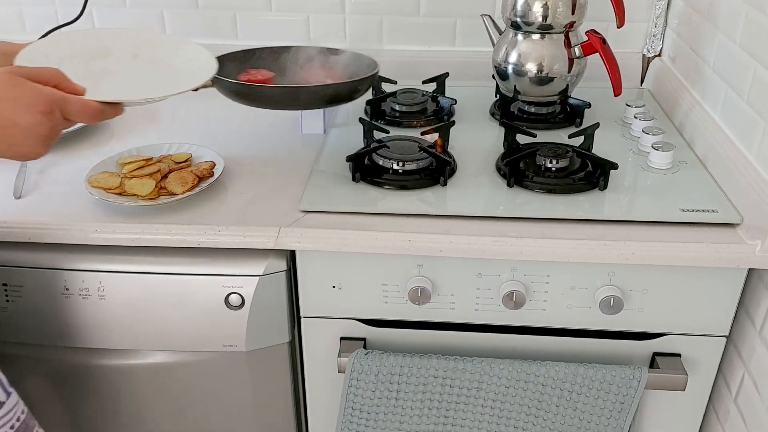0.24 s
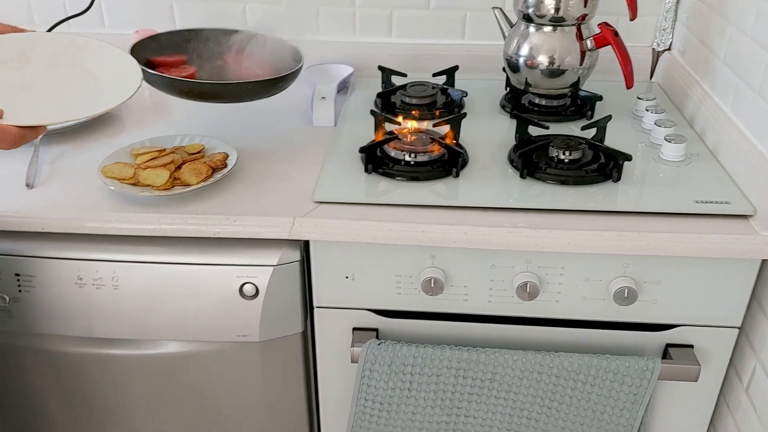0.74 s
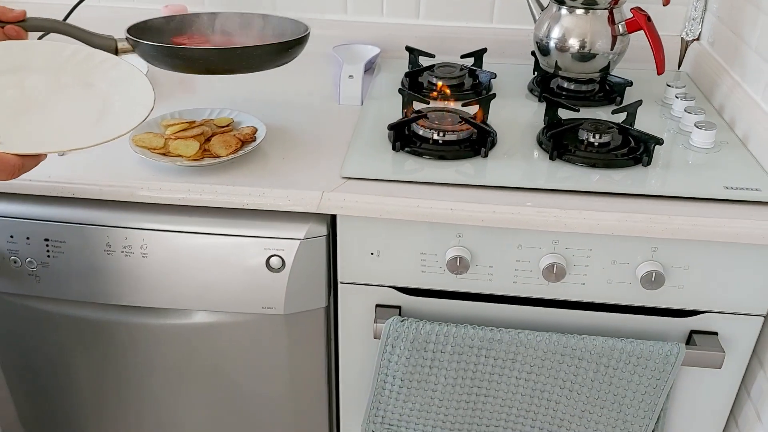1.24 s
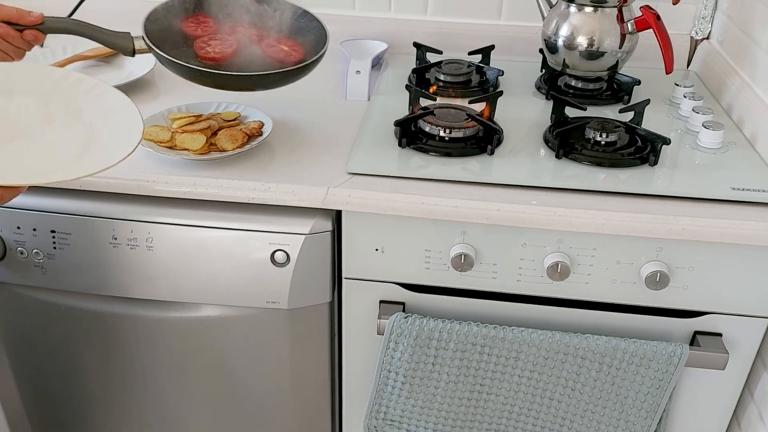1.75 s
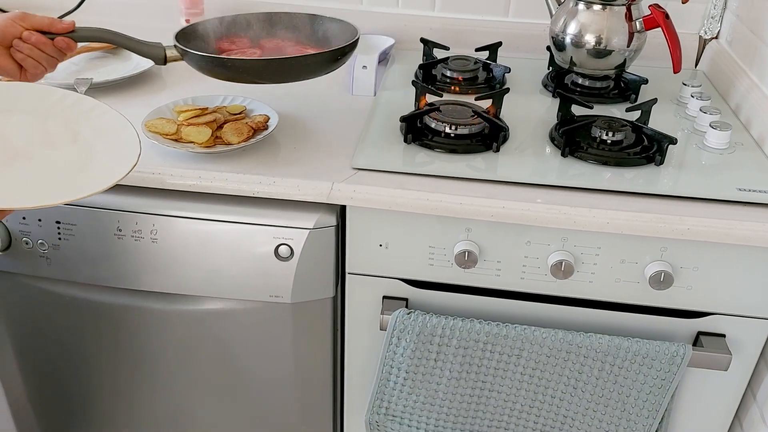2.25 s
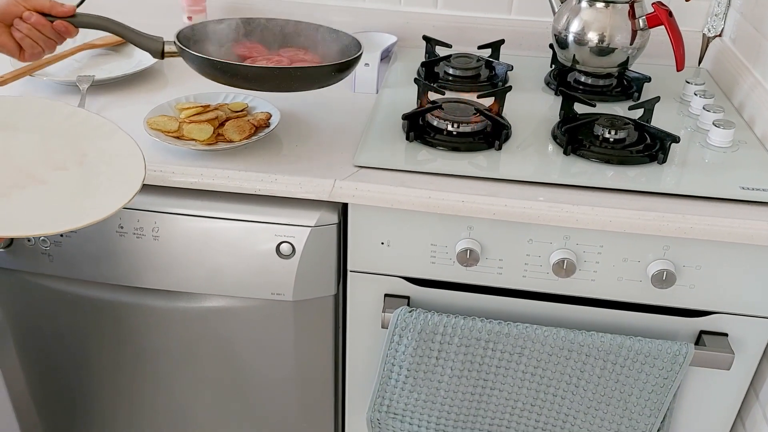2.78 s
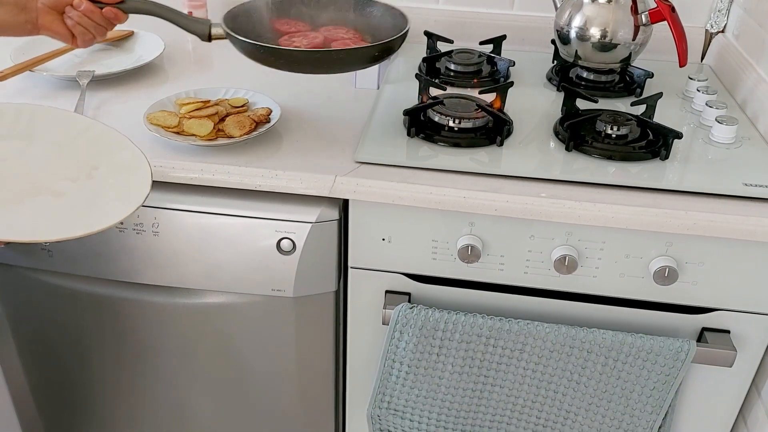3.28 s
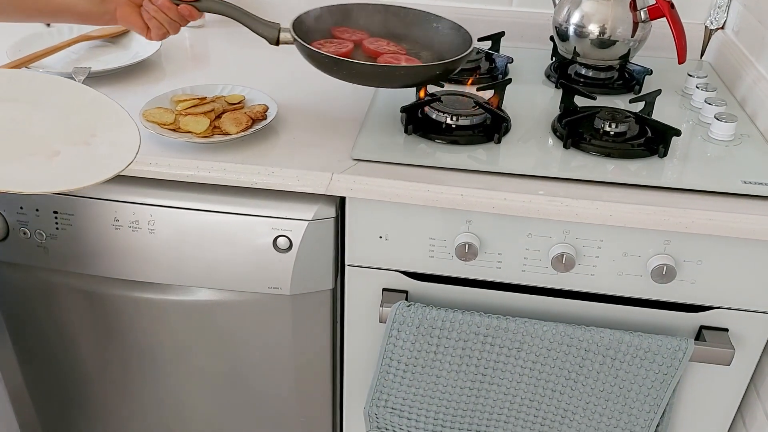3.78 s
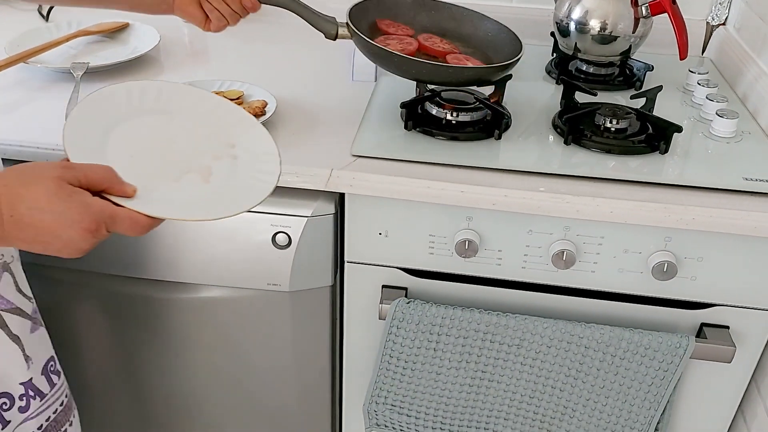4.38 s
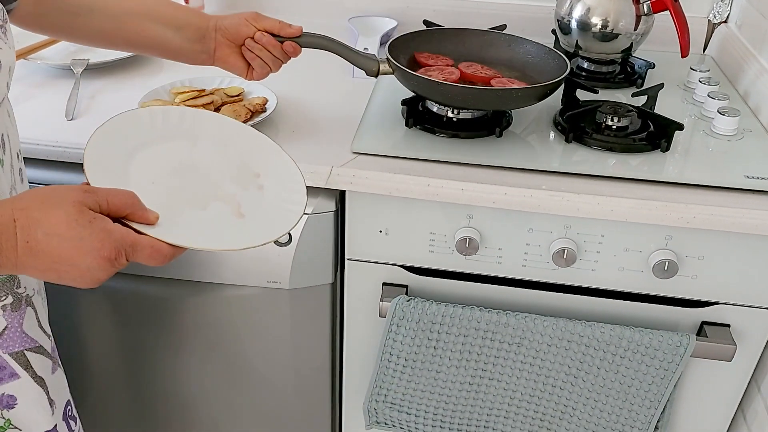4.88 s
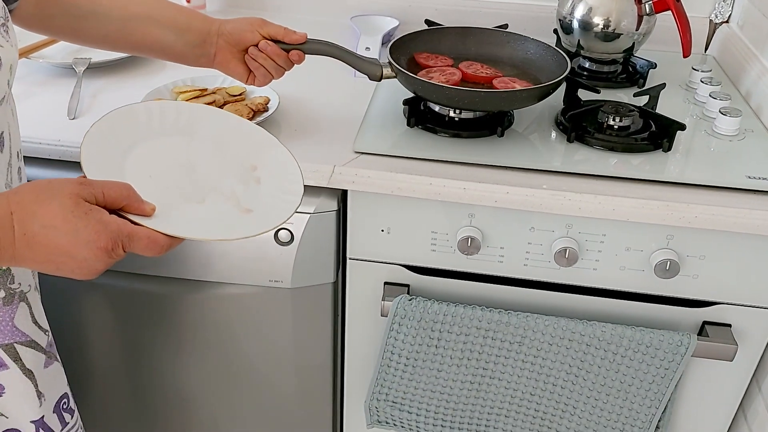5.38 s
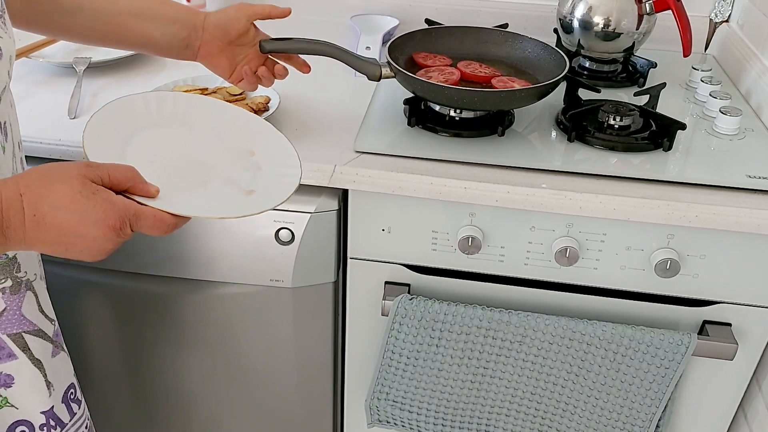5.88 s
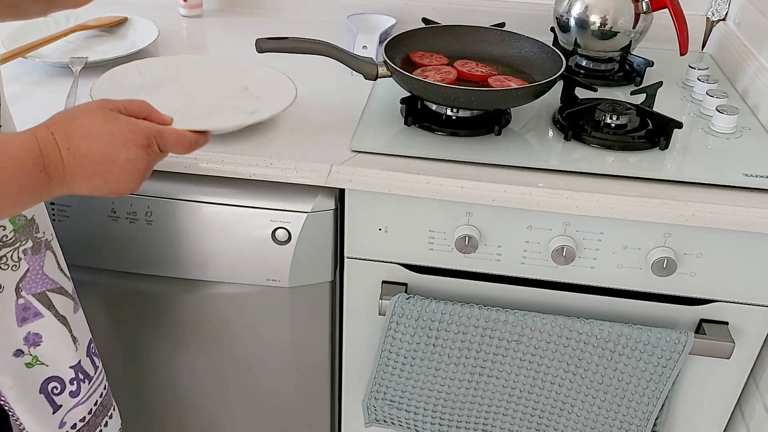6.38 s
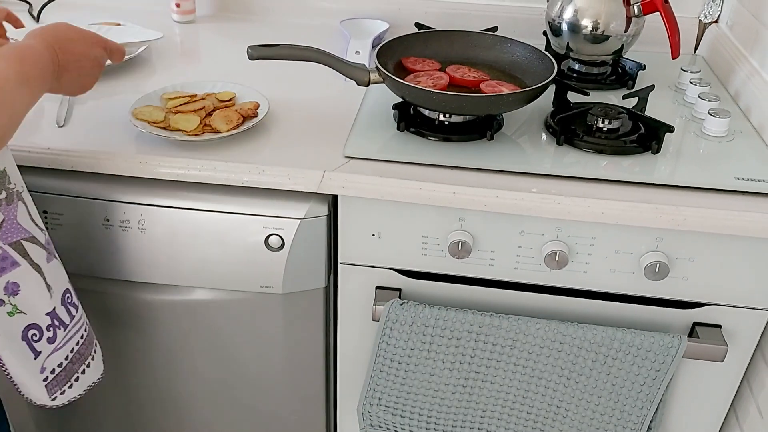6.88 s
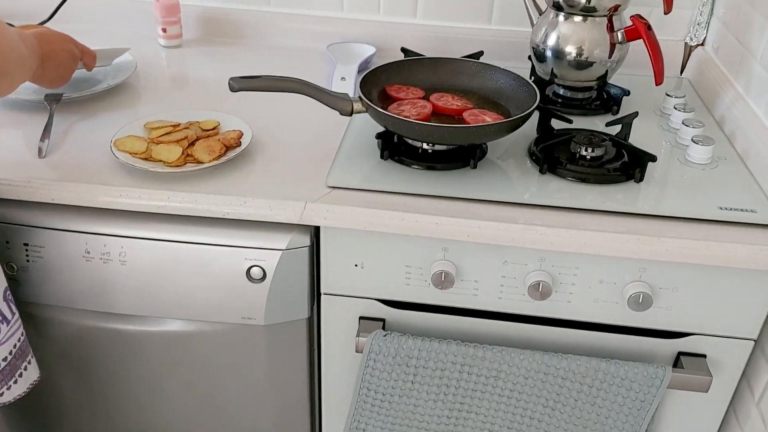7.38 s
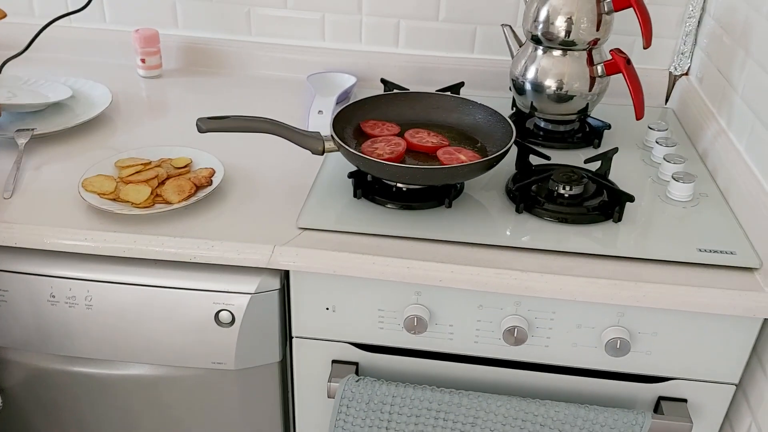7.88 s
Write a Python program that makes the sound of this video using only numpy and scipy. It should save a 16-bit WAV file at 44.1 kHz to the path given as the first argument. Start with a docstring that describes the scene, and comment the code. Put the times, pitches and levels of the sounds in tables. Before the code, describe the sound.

A bright, dense frying hiss with coarse crackles surges over a soft gas roar, heard close up with short tile reflections. Around the middle it eases to a thinner fizz. Dull metallic thuds and scrapes follow as the pan settles on the grate, then stray oil spits and small bumps, and last a sharp, quick rattle of china.

```python
"""Sizzling pan on a gas hob

Close at the hob in a small tiled kitchen: tomato slices sizzle in hot oil (coloured bubble pings and noise)
while the pan is swirled beside a roaring burner (fluttering noise), whose flame flares briefly.
The sizzle settles as the oil cools, then noise bursts set the pan down on the iron grate.
Last, a china plate clatters onto another (decaying sines), and the recorder's gain control turns all down."""
import sys
import numpy as np
from scipy import signal
from scipy.fft import rfft, irfft, next_fast_len
from scipy.io import wavfile
from scipy.ndimage import uniform_filter1d

SR = 44100
rng = np.random.default_rng(int(sys.argv[2]) if len(sys.argv) > 2 else 0)


def bounce(signal):
    """Save signal as a 16-bit WAV file at the path given by the first command-line argument."""
    frames = np.transpose(np.atleast_2d(signal))
    limited = np.clip(frames, -1, 1)
    pcm = np.round(limited * 32767).astype(np.int16)
    wavfile.write(sys.argv[1], SR, pcm)


N = 358908
T = np.arange(N) / SR


def amp(db):
    """Decibels to gain."""
    return 10 ** (np.asarray(db) / 20)


def unit(x):
    """Scales to an rms of one."""
    return x / np.sqrt(np.mean(x ** 2) + 1e-20)


def read(points, hz):
    """Reads a curve at any frequency, straight between its points on a log frequency axis."""
    f, value = np.transpose(points)
    return np.interp(np.log(hz + 1), np.log(f), value)


def add(mix, s, sound):
    """Mixes a stereo sound in at s seconds."""
    part = mix[:, round(s * SR):][:, :sound.shape[1]]
    part += sound[:, :part.shape[1]]


def colour(pair, spectrum):
    """Gives two unrelated signals a spectrum; the two microphones share the bass but not the treble."""
    # likeness of the two microphones: f/Hz, correlation
    likeness = [(100, 1), (300, 0.7), (650, 0.64), (1400, 0), (3000, 0)]
    # balance of the two microphones: f/Hz, left minus right/dB
    balance = [(110, -1.5), (400, -0.56), (750, 0.96), (1300, 2.1), (2400, 0.22), (8000, 0.65)]
    size = next_fast_len(pair.shape[1])
    hz = np.fft.rfftfreq(size, 1 / SR)
    a, b = rfft(pair, size)
    same = np.clip(read(likeness, hz), -1, 1)
    lean = amp(read(balance, hz) / 2)
    left = a * lean
    right = (same * a + np.sqrt(1 - same ** 2) * b) / lean
    shaped = np.array([left, right]) * amp(read(spectrum, hz))
    return unit(irfft(shaped, size)[:, :pair.shape[1]])


def drift(low_hz, high_hz):
    """Random wandering, rms one: a sum of sines with random phases."""
    t = T[::128]
    rates = np.geomspace(low_hz, high_hz, num=40)[:, None]
    waves = np.sin(2 * np.pi * (rates * t + rng.random(rates.shape))) / rates ** 0.08
    return np.interp(T, t, unit(waves.sum(0)))


def burst(spectrum, t60):
    """A blow into a body with many close, well-damped resonances: decaying coloured noise."""
    t = T[:SR // 2]
    return colour(rng.standard_normal((2, len(t))), spectrum) * amp(-60 * t / t60)


def kitchen(x, wet_db):
    """Adds the ring of a small tiled room, the treble dying first."""
    # ring of the room: f/Hz, t60/s
    ring_times = [(100, 0.3), (500, 0.43), (2000, 0.3), (6000, 0.22), (14000, 0.11)]
    hz, t, z = signal.stft(rng.standard_normal((2, SR // 2)), SR, nperseg=256)
    decay = amp(-60 * t / read(ring_times, hz)[:, None])
    tail = signal.istft(z * decay, SR, nperseg=256)[1]
    build_up = (1 - np.exp(-T[:tail.shape[1]] / 0.0041)) ** 2
    tail = colour(tail * build_up, [(1, 0)])
    wet = signal.fftconvolve(x, tail / np.linalg.norm(tail[0]), axes=1)[:, :N]
    return x + amp(wet_db) * wet


def hum(width_hz, level_db):
    """A faint, blurred hum stands in the room: noise narrowed to a few soft peaks."""
    # peaks of the hum: f/Hz, relative level/dB
    peaks = [(72, -74), (157, -75.5), (330, -72), (413, -64), (468, -65.5), (538, -70)]
    hz = np.fft.rfftfreq(N, 1 / SR)
    shape = sum(amp(db) / (1 + ((hz - f) / width_hz) ** 2) for f, db in peaks)
    noise = rfft(rng.standard_normal((2, N)))
    return amp(level_db) * colour(irfft(noise * shape, N), [(1, 0)])


def cooled(cooling, lag_s=0):
    """Level in dB as the oil cools: an S-shaped slide from hot to cool."""
    hot_db, cool_db, halfway_s, fall_s = cooling
    return cool_db + (hot_db - cool_db) / (1 + np.exp((T - lag_s - halfway_s) / fall_s))


def burner():
    """The gas flame roars and flutters; each flare of oil mist builds quickly and dies away."""
    # spectrum of the roar: f/Hz, relative level per Hz/dB
    roar = [(20, -26), (45, -22), (75, -6.5), (120, -5), (170, 0.5), (220, -4.5), (400, -0.5), (600, -2.5),
            (1500, -22), (5000, -50)]
    # the roar sinks as less oil mist reaches it: hot level/dB, cooled level/dB, halfway t/s, time scale/s
    roar_cooling = (-56, -66, 3.5, 0.3)
    # oil mist catches fire over the burner: start t/s, level/dB, rise/s, t60 of the dying roar/s
    flares = [(0, -55, 0.037, 1.2), (.3, -45, .2, 2.5), (1.2, -56, 0.088, 1.1), (3.4, -61, 0.37, 3)]
    level = amp(cooled(roar_cooling))
    for s, db, rise_s, t60 in flares:
        rise = np.clip((T - s) / rise_s, 0, 1)
        fall_db = -60 * np.maximum(T - s - rise_s, 0) / t60
        level = level + rise * amp(db + fall_db)
    flutter_db = 1.3 * drift(low_hz=3, high_hz=18)
    return colour(rng.standard_normal((2, N)), roar) * level * amp(flutter_db)


def china(modes, hard_hz, scatter_db, detune=0.0043):
    """One strike on a plate: each contact favours and bends other modes; a soft one spares the high ones."""
    t = T[:SR // 2]
    hz, mode_db, t60 = np.transpose(modes)[:, :, None]
    hz = hz * (1 + detune * rng.standard_normal(hz.shape))
    scattered_db = mode_db + scatter_db * rng.standard_normal((2, len(hz), 1))
    weight = amp(scattered_db) / np.hypot(1, (hz / hard_hz) ** 2)
    phase = rng.random((2, len(hz), 1))
    return (weight * amp(-60 * t / t60) * np.sin(2 * np.pi * (hz * t + phase))).sum(1)


def plates(scatter_db, thud_t60, left_db, tick_db):
    """A plate rattles to rest on another: each contact ticks, rings the china and thumps the counter."""
    # contacts: t/s, upper plate level/dB, lower plate level/dB, thud level/dB, hardness f/Hz
    clatter = [(7.685, -6.5, -15, -18, 7500), (7.698, -11, -30, -13.5, 6000), (7.729, -14, -34, -18, 5000),
               (7.755, -16, -25, -22.5, 3000), (7.879, -17, -8.5, -11, 4500), (7.891, -6, -15, -13.5, 4020),
               (7.908, -17.5, -15, -11.5, 6000), (7.920, -10.5, -11.5, -21, 12000),
               (7.931, -22, -25, -23, 5000), (7.959, -26, -11, -15, 3030), (7.972, -22, -21, -13, 4000),
               (7.988, -35, -31, -23, 2500)]
    # modes of the carried plate: f/Hz, level/dB, t60/s
    upper_plate = [(1862, -5.5, 0.13), (1930, 1, 0.16), (2944, -4.5, 0.083), (3000, -11, 0.17),
                   (3860, -21, 0.15), (4470, -16, 0.15), (5540, -16.5, 0.22), (6390, -24, .16),
                   (7030, -18, .24), (9780, -11, 0.19), (13700, -17, .12)]
    # modes of the plate it meets: f/Hz, level/dB, t60/s
    lower_plate = [(1012, -6, 0.13), (1115, -15, 0.085), (1210, -11.5, 0.1), (1590, -4.5, 0.073),
                   (1674, -4.5, 0.085), (1780, -7, .1), (2032, -2, 0.11), (2260, -4.5, 0.13),
                   (3130, -3.5, 0.11), (3850, -9, .1), (4730, -9.5, 0.094), (6940, -19, 0.092)]
    # spectrum of the counter's thump: f/Hz, relative level per Hz/dB
    counter_thud = [(25, -36), (70, -21), (110, -15), (158, 1), (215, -12), (450, -2), (750, -3.5),
                    (1000, -2), (1350, -0.5), (1750, 1), (2500, -3), (3150, -1), (3700, -13), (14000, -20)]
    out = np.zeros((2, N))
    for s, upper_db, lower_db, thud_db, hard_hz in clatter:
        ring = amp(upper_db) * china(upper_plate, hard_hz, scatter_db)
        ring += amp(lower_db) * china(lower_plate, hard_hz, scatter_db)
        tick_spectrum = [(hard_hz / 4, -30), (hard_hz, 0), (hard_hz * 2, -8)]
        tick = amp(max(upper_db, lower_db) + tick_db) * burst(tick_spectrum, t60=.08)
        thud = amp(thud_db) * burst(counter_thud, thud_t60)
        blow = ring * amp([[left_db], [-left_db]]) + tick + thud
        add(out, s, blow * (1 - np.exp(-T[:SR // 2] / 0.00065)))  # softened onset
    return kitchen(out, wet_db=-4.0)


def knocks():
    """The pan lands and rocks on the grate; small bumps and spits are humps of noise that die away."""
    # pan on the grate: t/s, thud level/dB, scrape level/dB
    landings = [(4.811, -50, -33), (5.051, -34, -32), (5.078, -34, -27.5), (5.103, -38, -48),
                (5.147, -36, -28), (5.163, -32, -38), (5.333, -41, -50), (5.36, -41, -48),
                (5.395, -43, -40)]
    # spectrum of the grate's thud: f/Hz, relative level per Hz/dB
    grate_thud = [(25, -36), (65, -9), (110, -13), (170, 5), (240, -7), (370, -8), (650, -5.5), (950, -10),
                  (1600, -22), (2500, -26), (12000, -55)]
    # spectrum of the scrape on the grate: f/Hz, relative level per Hz/dB
    grate_scrape = [(200, -28), (1000, -13), (1250, -4), (1600, -5), (2000, -8), (2400, -10), (5000, -22),
                    (12000, -50)]
    # soft bumps of handling and steps: t/s, level/dB, centre f/Hz, width/octaves, t60/s
    bumps = [(3.457, -35.5, 600, 0.82, 0.11), (4.06, -41, 600, 0.55, 0.09), (4.155, -40.5, 480, 0.43, 0.13),
             (6.96, -42.5, 554, 0.83, 0.21), (6.975, -45, 146, 0.34, 0.21), (7.25, -41.5, 570, .25, 0.15),
             (7.525, -33.5, 1500, 0.63, 0.13)]
    # larger spits of oil: t/s, level/dB, centre f/Hz, width/octaves, t60/s
    spits = [(.31, -26.5, 2330, .7, .04), (1.722, -23, 1980, 0.79, 0.035), (1.803, -21.5, 3120, .15, 0.092),
             (3.138, -28.5, 2100, 0.22, 0.14), (6.341, -30.5, 2500, 1.9, .04), (6.424, -43, 2500, 1.5, .04),
             (6.797, -39, 2500, 1.2, .04), (7.26, -27, 4500, 0.94, 0.081), (7.476, -30, 2200, 0.83, 0.052)]
    out = np.zeros((2, N))
    for s, thud_db, scrape_db in landings:
        thud = amp(thud_db) * burst(grate_thud, t60=0.16)
        scrape = amp(scrape_db) * burst(grate_scrape, t60=0.1)
        add(out, s, thud + scrape)
    hz = np.geomspace(30, 16000, num=80)
    for s, db, centre_hz, octaves, t60 in bumps + spits:
        hump_db = -20 * np.log10(1 + (np.log2(hz / centre_hz) / octaves) ** 2)
        dull_db = -20 * np.log10(1 + (hz / centre_hz / 3) ** 2)
        add(out, s, amp(db) * burst(np.c_[hz, hump_db + dull_db], t60))
    return kitchen(out, wet_db=-6.5)


def bubbles(per_s, low_hz, high_hz, cycles, spread_db, count=24):
    """Steam bubbles burst at random: many faint, a few strong, each a ping of a few cycles."""
    out = np.zeros((2, N))
    for hz in np.geomspace(low_hz, high_hz, count):
        when, size, side = rng.random((4000, 3))[:int(per_s * T[-1] / count)].T
        height = amp(spread_db * np.minimum(-np.log(1 - size), 4))
        at = (when * (N - 30)).astype(int)
        clicks = np.zeros((2, N))
        clicks[0, at] = height
        clicks[1, at + (side * 24).astype(int)] = height  # up to half a millisecond later at the right
        turns = hz * T[:300]
        ping = np.sin(2 * np.pi * turns) * np.exp(-turns / cycles)
        out += hz * signal.oaconvolve(clicks, ping[None], axes=1)[:, :N]
    # each burst bounces between the pan's wall and the tiles for a few milliseconds
    bounces = rng.standard_normal((2, 400)) * np.exp(-T[:400] / .002)
    flat = irfft(np.exp(1j * np.angle(rfft(bounces))))  # smears time, leaves the spectrum level
    return unit(signal.oaconvolve(out, flat, axes=1)[:, :N])


def swells():
    """What the swells add to the fizz and to the bubbling, in dB: one smooth hump each."""
    # mostly as the pan tilts and hot oil runs under the slices:
    # crest t/s, length/s, fizz level/dB, bubbling level/dB
    humps_table = [(.5, 0.74, 1.2, 1), (1.333, 0.37, 0.2, 0.8), (1.75, 0.78, 1.1, 2.2),
                   (2.346, 1, 2.7, 1.5), (3.0, 0.26, 1.5, -0.2), (3.953, 0.47, 0.9, -0.1),
                   (7.4, .6, 1, -0.1)]
    crest_s, length_s, fizz_db, bubbling_db = np.transpose(humps_table)
    place = (T - crest_s[:, None]) / length_s[:, None]
    humps = np.cos(np.pi * np.clip(place, -.5, .5)) ** 2
    return fizz_db @ humps, bubbling_db @ humps


def sizzle():
    """Countless tiny bursts merge into fizz; larger ones bubble and crackle under the wet slices."""
    # spectrum of the fizz: f/Hz, relative level per Hz/dB
    fizz_spectrum = [(40, -70), (500, -40), (1500, -24), (3200, -11.5), (4100, -9.5), (5300, -1.5),
                     (6700, -2), (7800, 0.6), (9400, -1.5), (11000, -2), (12400, -0.9), (14200, -3),
                     (15700, -3)]
    # spectrum of the bubbling: f/Hz, relative level per Hz/dB
    bubbling_spectrum = [(40, -55), (150, -30), (330, -19), (600, -14.5), (800, -12), (1000, -11.5),
                         (1250, -6), (1850, -1.5), (2250, -2.5), (3000, 0.5), (3600, -1.5), (5300, -2.5),
                         (6500, -9), (12000, -40)]
    # off the flame the fizz sinks: hot level/dB, cooled level/dB, halfway t/s, time scale/s
    fizz_cooling = (-19.5, -26, 3.5, .5)
    # the coarse bubbling sinks too: hot level/dB, cooled level/dB, halfway t/s, time scale/s
    bubbling_cooling = (-27, -36, 3.5, 0.66)
    surge = drift(low_hz=5, high_hz=35.4)  # steam escapes in uneven gushes
    fine = bubbles(per_s=2500, low_hz=3020, high_hz=14900, cycles=1.3, spread_db=4.5)
    fine = unit(kitchen(fine, wet_db=2.5))
    coarse = bubbles(per_s=800, low_hz=590, high_hz=5910, cycles=1.47, spread_db=4.0)
    coarse = unit(kitchen(coarse, wet_db=2.0))
    # the smallest bursts are too many to tell apart and blend into a wash
    fizz = colour(fine + amp(4) * rng.standard_normal((2, N)), fizz_spectrum)
    bubbling = colour(coarse + amp(3.5) * rng.standard_normal((2, N)), bubbling_spectrum)
    # the finest spray, the top of the fizz, holds out longer
    treble = signal.butter(N=3, Wn=9500, btype="high", fs=SR, output="sos")
    spray = signal.sosfiltfilt(treble, fizz)
    spray_db = cooled(fizz_cooling, lag_s=0.7) - 0.05
    fizz = (fizz - spray) * amp(cooled(fizz_cooling)) + spray * amp(spray_db)
    fizz_swell_db, bubbling_swell_db = swells()
    fizz *= amp(fizz_swell_db + 0.28 * surge)
    bubbling *= amp(cooled(bubbling_cooling) + bubbling_swell_db + 0.44 * surge)
    return fizz + bubbling


def hollow(x):
    """Fixed resonances of the pan and the tiled corner around it favour a few pitches."""
    # resonances: f/Hz, width/Hz, level/dB
    resonances = [(412, 21, 5), (490, 40, -0.5), (608, 15, 5.5), (677, 29, 4), (790, 37, 6),
                  (1156, 58, 5.5), (1690, 24, -3)]
    hz = np.fft.rfftfreq(N, 1 / SR)
    gain_db = sum(db / (1 + (2 * (hz - f) / width) ** 2) for f, width, db in resonances)
    return irfft(rfft(x) * amp(gain_db), N)


def scene():
    """Everything that sounds around the hob."""
    hob = hollow(sizzle() + burner())
    room = hum(width_hz=9.3, level_db=-61.0)
    china_clatter = plates(scatter_db=2.0, thud_t60=0.098, left_db=1.3, tick_db=-16)
    return hob + room + knocks() + china_clatter


def gain_control(x, threshold_db, most_db, attack_s, recover_db_per_s):
    """Loud sound turns the gain down within some hundredths of a second; it creeps back slowly."""
    power = uniform_filter1d((x ** 2).mean(0), size=256)
    power_db = 10 * np.log10(abs(power) + 1e-12)
    over_db = np.clip(power_db - threshold_db, 0, most_db)
    recovery_db = recover_db_per_s * T
    held_db = np.maximum.accumulate(over_db + recovery_db) - recovery_db
    r = np.exp(-1 / (attack_s * SR))
    return x * amp(-signal.lfilter([1 - r], [1, -r], held_db))


def record(dry):
    """The microphone's bass roll-off, gain control, the ceiling of full scale, then the band limit."""
    roll_off = signal.butter(N=3, Wn=52, btype="high", fs=SR, output="sos")
    heard = signal.sosfilt(roll_off, dry)
    ducked = gain_control(heard, threshold_db=-17.0, most_db=5.5, attack_s=0.022, recover_db_per_s=7)
    band_limit = signal.firwin(511, 15800, window=("kaiser", 9), fs=SR)  # low-pass, Hz
    return signal.oaconvolve(np.clip(ducked, -1, 1), band_limit[None], "same")


dry = scene()
out = record(dry)
bounce(out)
```